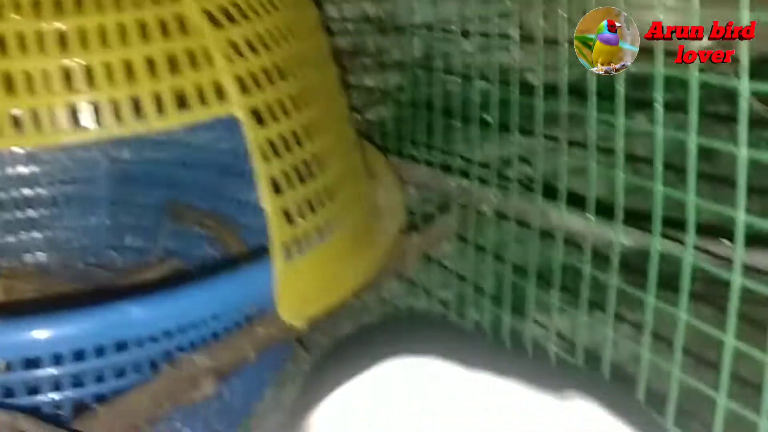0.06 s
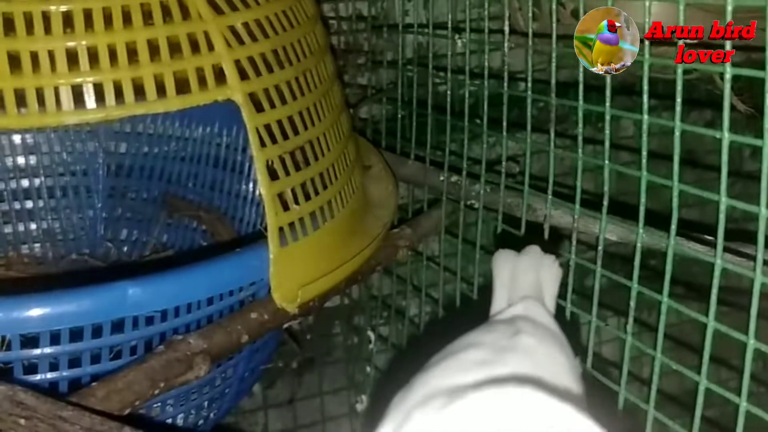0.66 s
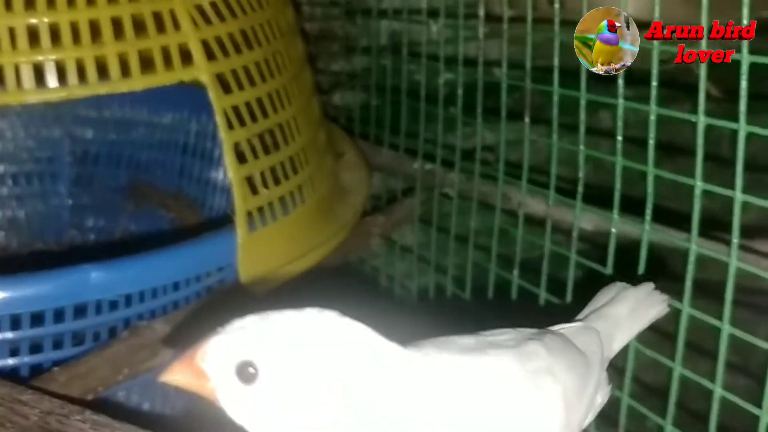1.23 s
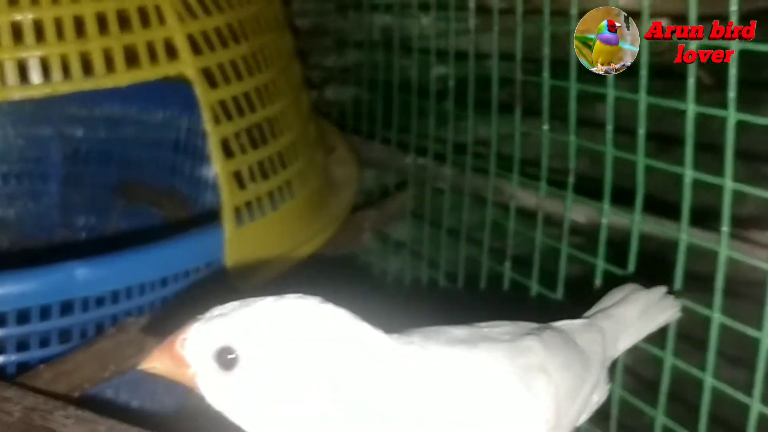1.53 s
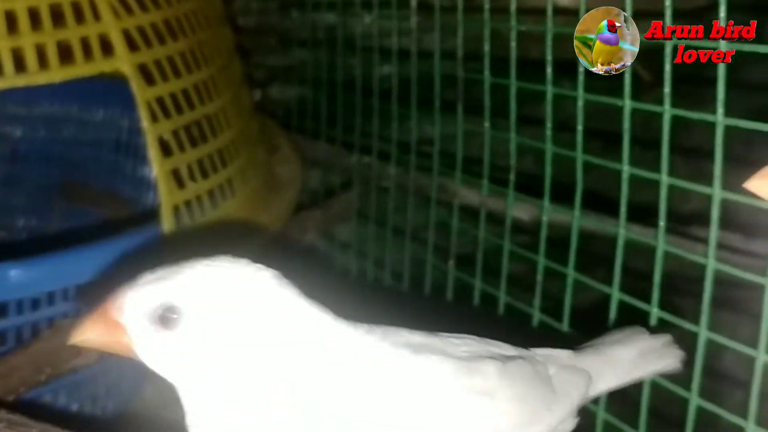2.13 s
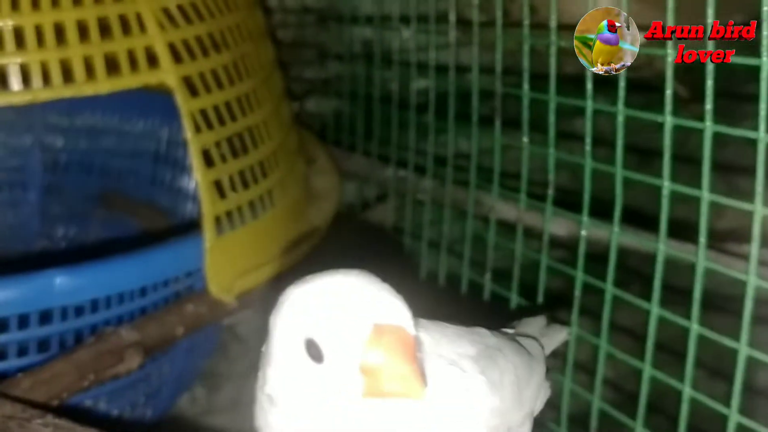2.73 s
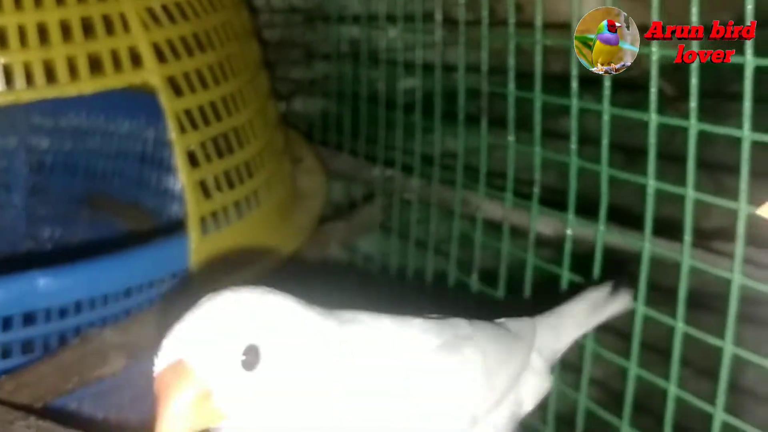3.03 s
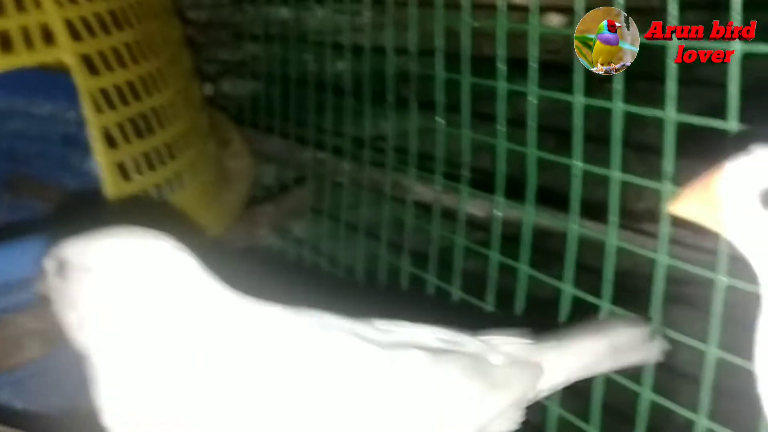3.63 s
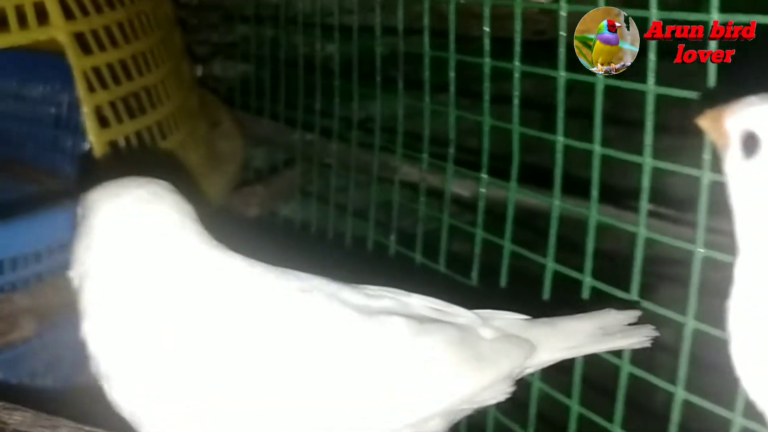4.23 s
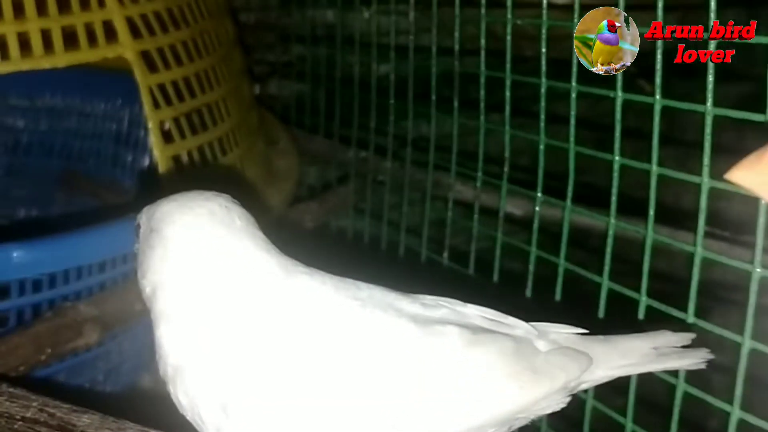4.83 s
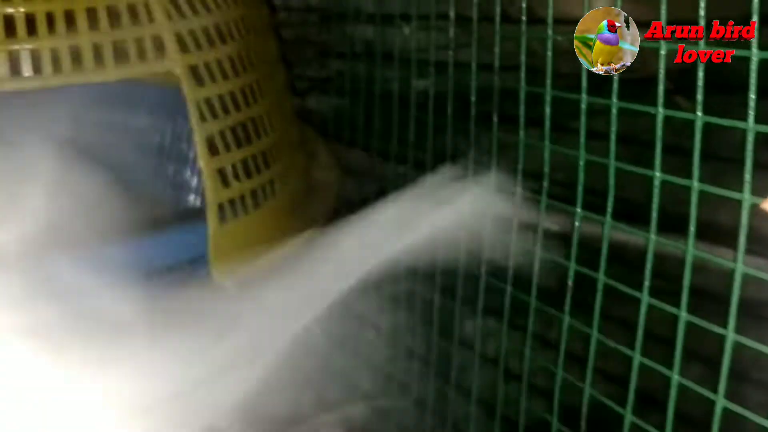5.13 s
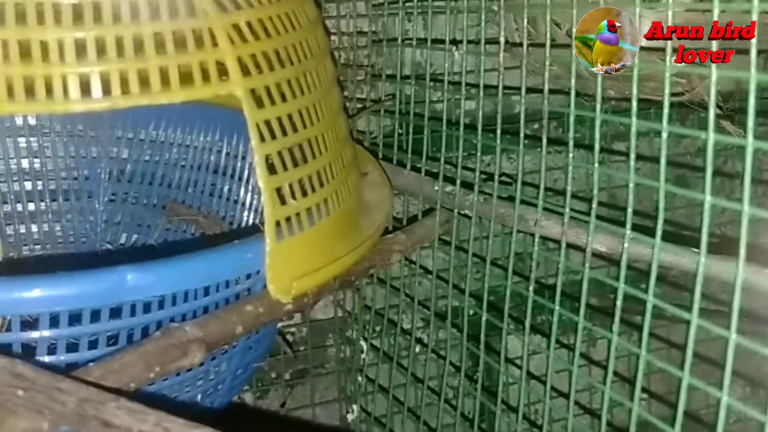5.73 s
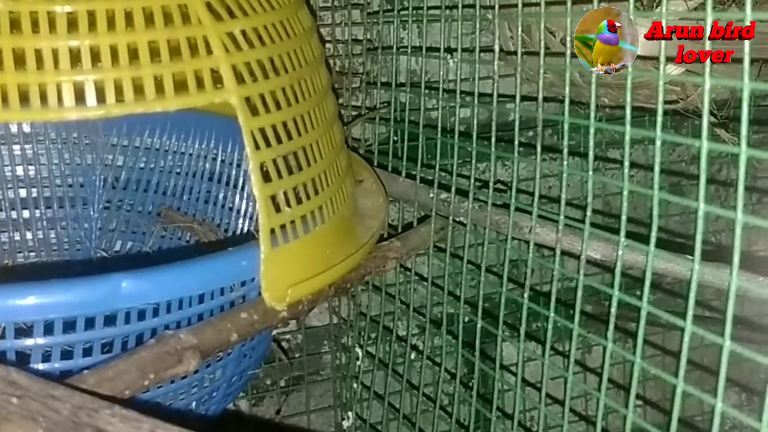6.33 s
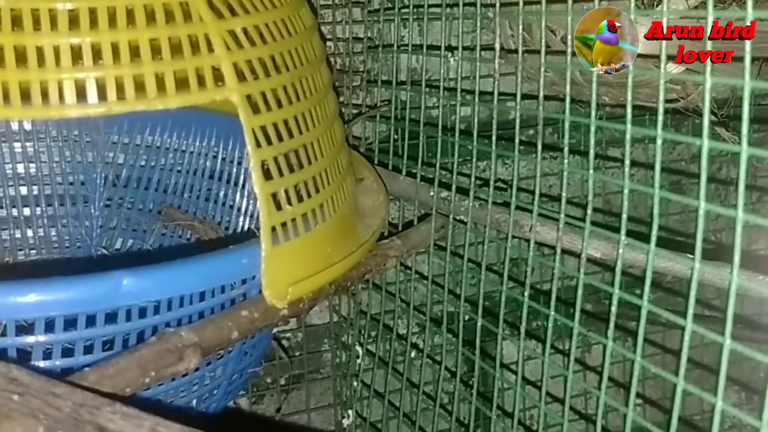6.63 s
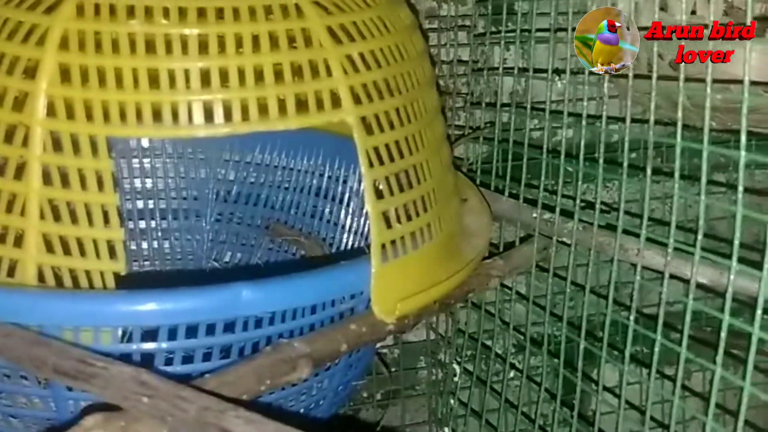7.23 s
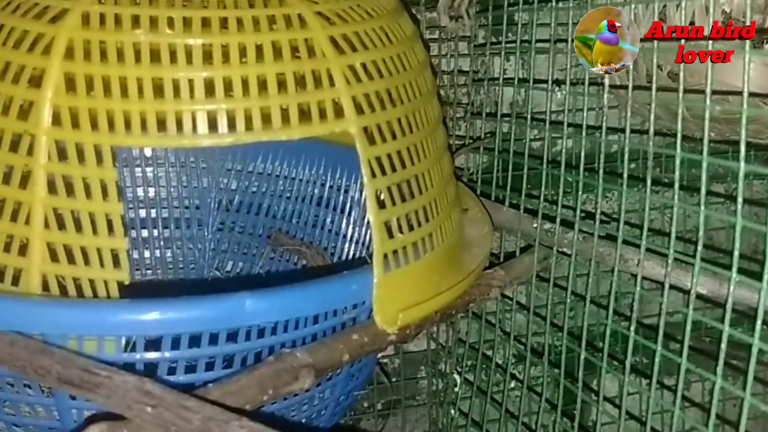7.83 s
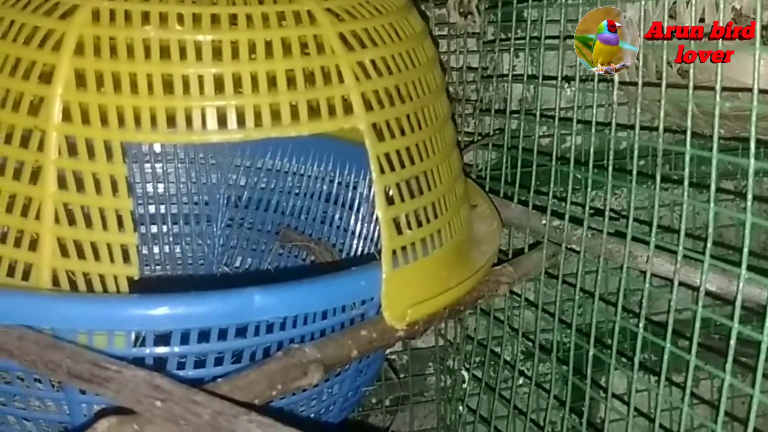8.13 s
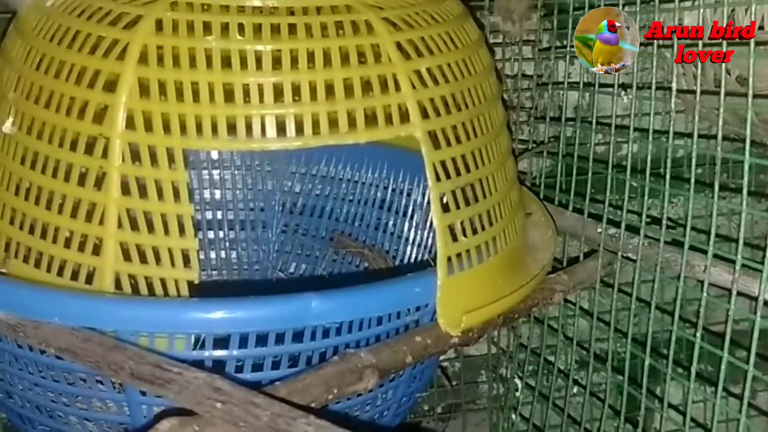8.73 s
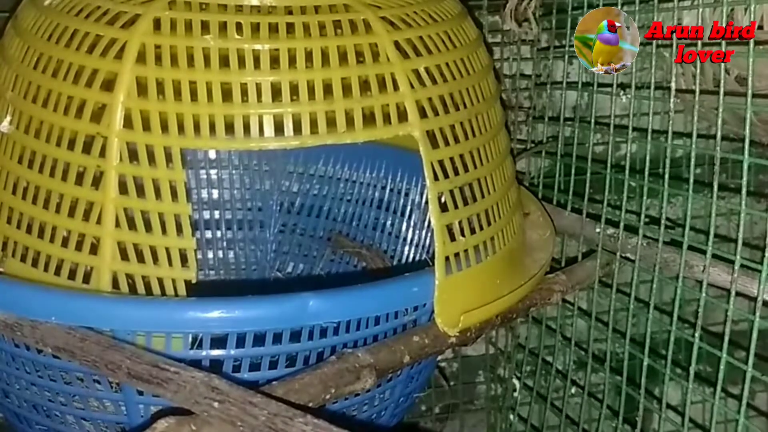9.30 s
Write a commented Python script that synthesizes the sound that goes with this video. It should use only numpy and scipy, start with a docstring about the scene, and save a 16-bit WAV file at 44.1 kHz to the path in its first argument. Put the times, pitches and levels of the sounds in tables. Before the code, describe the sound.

Close wing gusts thump the microphone on the right, one sharply overloading it, as small finches flutter, tap and rustle in a wire cage in a small room. The movement pauses, leaving a quiet motor hum, a soft nasal call and two faraway crow caws. After another call, plumage rubs the microphone with a low rumble. The taps, rustles and puffs of air return, with faint squeaks and the crow cawing again outside.

```python
"""Small finches preen and hop in a wire cage beside a phone: feathers rustle, claws tap, wing draught thumps
on the right port. At 0.8 s a wing overloads it as a soft nasal call sounds; two flutters follow.
In a lull a finch calls (3.3 s) and a far crow caws twice. After a third call (5 s) a bird brushes
the phone. From the fourth (6.9 s) the hopping resumes, with three more caws behind it.
A low motor hums throughout."""
import sys
import numpy as np
from scipy import signal
from scipy.fft import rfft, irfft, next_fast_len
from scipy.io import wavfile
from scipy.ndimage import uniform_filter1d

SR = 44100
rng = np.random.default_rng(int(sys.argv[2]) if len(sys.argv) > 2 else 0)


def to_wav(sig):
    """Store sig (one row per channel, or 1-D mono) as 16-bit WAV at the path in sys.argv[1].

    Samples outside -1..1 are clipped; the rate is SR.
    """
    pcm = np.clip(np.atleast_2d(sig), -1, 1) * 32767
    pcm = np.round(pcm).astype(np.int16)
    wavfile.write(sys.argv[1], SR, pcm.T)  # frames by channels


N = 421596
T = np.arange(N) / SR

# shuffling, preening, shaking: peak t/s, level/dB, rise/s, fall/s
PREEN_SWELLS = [(.11, -60.5, .2, .19), (.805, -59, .06, .14), (1.035, -68, .05, 0.22),
                (1.24, -59.5, 0.095, .1), (1.40, -57.5, 0.19, 0.27), (1.86, -51.5, 0.27, 0.12),
                (2.09, -58.5, .05, 0.13), (2.27, -58.5, 0.036, 0.12), (2.575, -69.5, 0.029, 0.069),
                (5.25, -61, .14, .24), (5.55, -58.5, 0.19, .45), (5.955, -64.5, 0.23, .13),
                (6.112, -64.5, 0.032, .17), (6.812, -69, 0.039, .22), (7.258, -66.5, 0.044, .19),
                (7.645, -58.5, 0.22, .16), (7.86, -52.5, 0.091, .13), (8.112, -64.5, .03, .33),
                (8.48, -56.5, .03, 0.23), (8.74, -57, .09, .15), (8.95, -59.5, 0.2, .38),
                (9.28, -62, 0.25, .27), (9.425, -67, .04, .2)]
# feather friction: f/Hz, level/dB
FEATHER_SPECTRUM = [(150, -29), (300, -11), (600, -7), (1200, -10.5), (2200, -12), (3400, -14.5),
                    (5000, -9), (6300, -10.5), (7500, -1.5), (8800, -3), (10200, -9), (13800, -9.5)]


def feathers():
    """Barbs slide over each other in uneven strokes; harder rubbing makes them catch and snap."""
    effort = swells(PREEN_SWELLS)
    strokes = unit(amp(2.3 * wobble(45)))
    catching = np.clip(effort / amp(-61), .35, 1) * barbs(rate_hz=170, spread_db=4)
    grain = patchy(noise() + catching, depth_db=1.4)
    return amp(-0.5) * effort * strokes * coloured(grain, FEATHER_SPECTRUM)


def barbs(rate_hz, spread_db):
    """Tiny random snaps of very uneven size, rms 1."""
    snaps = rng.random(N) < rate_hz / SR
    size = amp(spread_db * np.minimum(rng.exponential(size=N), 4))
    decay_s = 0.00046
    envelope = signal.lfilter([1], [1, -np.exp(-1 / (decay_s * SR))], snaps * size)
    return unit(noise() * envelope)


# wingbeat runs: start t/s, length/s, first level/dB, growth/(dB/s)
FLUTTER_RUNS = [(1.174, .088, -45, 85), (1.595, .263, -44.5, 60)]


def wingbeats(period_s=.0348, gain_db=1.5, knock_db=-4):
    """A flutter is an even run of growing wing flicks; rows as in CONTACTS."""
    return [(s + t, gain_db + db + growth * t, knock_db)
            for s, length_s, db, growth in FLUTTER_RUNS for t in np.arange(0, length_s, period_s)]


# wing flicks, claw landings: t/s, level/dB, relative knock/dB
CONTACTS = [(.1108, -28.5, -1), (.236, -48, -1.5), (.302, -53, -18), (1.0072, -50, 6), (1.509, -38.5, -13),
            (1.5297, -38, -2.5), (2.0238, -36.5, 4.5), (2.0715, -31.5, 11), (2.1033, -31.5, 3),
            (2.1708, -43, 4.5), (2.221, -43.5, 2), (2.254, -40, -1), (5.198, -43.5, 2.5), (5.35, -46.5, 8),
            (5.5002, -42, 9.5), (5.5317, -36, 2), (7.403, -49.5, -15), (7.5136, -44.5, -7),
            (7.604, -34.5, 5.5), (7.842, -30.5, -3.5), (7.938, -40.5, 1.5), (8.462, -36, 0.5),
            (8.5658, -29, -10), (8.6905, -39.5, 1)]
# bright contact, dull cage knock: f/Hz, level/dB
CLAW_SPECTRUM = [(300, -42), (2000, -12.5), (3500, -16), (6000, -7.5), (8500, 1), (10500, -7.5),
                 (14000, -6.5)]
CAGE_SPECTRUM = [(60, -8), (200, 12.5), (600, 8.5), (1200, -2), (2200, -5.5), (4500, -6.5), (9000, -27)]


def flicks(attack_s=0.0036, t60_s=0.033, graze_db=-15, graze_s=0.0051):
    """Each flick, wingbeat or landing is a clump of bright contacts with a dull knock from the cage."""
    bright, dull = np.zeros(N), np.zeros(N)
    t = np.arange(-SR // 25, SR // 5) / SR
    after = np.maximum(t, 0)
    blow = (1 - np.exp(-(after / attack_s) ** 2)) * amp(-60 * after / t60_s)
    blow += amp(graze_db) * np.exp(-np.abs(t) / graze_s)  # feathers graze ahead of the contact
    for s, db, knock_db in list(CONTACTS) + wingbeats():
        add(bright, s + t[0], amp(db) * blow)
        add(dull, s + t[0], amp(db + knock_db) * blow)
    catches = unit(amp(4 * wobble(900)))
    taps = bright * coloured(noise() * catches, CLAW_SPECTRUM)
    knocks = dull * coloured(noise(), CAGE_SPECTRUM)
    return amp(-2) * taps + amp(-10) * knocks


# air from wing strokes and hops: peak t/s, level/dB, rise/s, fall/s
GUST_SWELLS = [(.096, -28.5, 0.072, 0.071), (.83, -31, .02, 0.13), (2.1, -52, 0.16, .35),
               (7.85, -31.5, 0.068, 0.1), (8.53, -30.5, 0.079, 0.073), (9.18, -36, 0.17, 0.25)]
# port buffeting: f/Hz, level/dB
BUFFET_SPECTRUM = [(10, -20), (30, 5), (70, 0), (130, -16), (250, -26), (500, -36.5), (1200, -50),
                   (4000, -93.5)]


def draught():
    """Stirred air buffets the right port; little reaches the left."""
    return swells(GUST_SWELLS) * coloured(noise(), BUFFET_SPECTRUM) * amp([[-11], [4]])


# eddies at the right port: t/s, level/dB, half length/s, turbulence f/Hz
EDDIES = [(.043, -22, .0036, 120), (0.093, -16, 0.0066, 68), (.108, -13, 0.0048, 320),
          (.118, -30, .00033, 1790), (.13, -24, 0.0089, 250), (0.8123, -8, 0.0012, 899),
          (.897, -36.5, 0.013, 289.6), (0.941, -40, 0.0096, 257), (2.078, -46, .02, 150),
          (6.969, -48.5, .0058, 430), (7.026, -58.5, .033, 483), (7.70, -50, .017, 400),
          (8.567, -29, 0.005, 40), (8.581, -30.5, .012, 593), (9.184, -32.5, .009, 265)]


def puffs():
    """An eddy thumps with turbulent suction; the microphone's bass cut shapes a soft swell around it."""
    port = np.zeros(N)
    t = np.arange(-SR // 16, SR // 16) / SR
    for s, db, half_s, eddy_hz in EDDIES:
        core = np.exp(-(t / half_s) ** 2)
        band = lambda hz: hz / (hz + eddy_hz / 5) / (1 + (hz / eddy_hz) ** 3)
        churn = filtered(rng.standard_normal(len(t)), band) * core
        churn *= np.linalg.norm(core) / np.linalg.norm(churn)
        low_swell = np.exp(-np.abs(t) / (0.0068 + half_s))
        suction = core - low_swell * core.sum() / low_swell.sum()
        turbulence = min(0.27 + 90 * half_s, 1)  # long eddies have broken up more
        add(port, s + t[0], amp(db) * (turbulence * churn - (1.25 - turbulence) * suction))
    return port * amp([[-42], [0]])


def wing_slap(at_s=.8093, gain_db=2, half_s=0.0013, tip_db=3.5, crack_db=-19):
    """A wing whips past the right port: a block of suction, split by the snap of the feather tip."""
    t = np.arange(-SR // 16, SR // 16) / SR
    suction = np.exp(-np.minimum(np.abs(t / half_s), 4) ** 5)
    tip = np.exp(-np.abs((t + .00045) / .00019) ** 1.3)
    crack = rng.standard_normal(len(t)) * np.exp(-np.abs(t + .0003) / .0005)
    low_swell = 0.077 * np.exp(-np.abs(t) / 0.016)  # shaped by the microphone's bass cut
    pulse = low_swell - suction + amp(tip_db) * tip + amp(crack_db) * crack
    port = np.zeros(N)
    add(port, at_s + t[0], amp(gain_db) * pulse)
    return port * amp([[-44], [0]])


# bird against the phone: peak t/s, level/dB, rise/s, fall/s
BRUSH_SWELLS = [(5.29, -41.5, 0.14, 0.22), (5.5, -44.5, 0.14, 0.072), (5.68, -40, 0.15, 0.31)]
# brushed shell: f/Hz, level/dB
SHELL_SPECTRUM = [(15, -26), (25, 4.5), (71, -0.5), (168, -12), (456, -29.5), (958, -36), (1220, -42),
                  (1750, -39.5), (2220, -45.5), (3000, -47.5), (3900, -46.5), (6600, -120)]


def brush(bumps_db=3.0):
    """Plumage drags over the phone's shell with a bumpy rumble and small catches."""
    drag = noise() + .8 * barbs(rate_hz=70, spread_db=3)
    pressure = swells(BRUSH_SWELLS) * unit(amp(bumps_db * wobble(35)))
    return pressure * coloured(drag, SHELL_SPECTRUM) * amp([[-2], [4]])


# calls: t/s, length/s, pitch/Hz, level/dB, lower resonance f/Hz, half width/Hz, upper resonance/dB, rasp
NASAL_CALLS = [(0.817, .13, 553.5, -52, 2850, 1240, -11.5, 0.1),
               (3.319, .076, 546, -66, 3350, 2800, 6, 0.5),
               (5.037, .074, 573.5, -51, 4146, 1097, -0.5, 0.4),
               (6.927, 0.083, 548.4, -60.5, 3900, 3410, 5, 0.2)]
# lift, then sag: length fraction, pitch ratio
CALL_CONTOUR = [(0, .94), (.3, 1), (.55, 0.98), (1, .93)]
# walls near the birds: f/Hz, T60/s
PERCH_DECAY = [(2000, 0.087), (9000, 0.13)]


def finches(upper_hz=8100):
    """Short nasal, raspy stacks of harmonics through two resonances of the throat and beak."""
    voice = np.zeros(N)
    for s, length_s, pitch_hz, db, lower_hz, width_hz, upper_db, rasp in NASAL_CALLS:
        def throat(hz):
            lower = 1 / (1 + ((hz - lower_hz) / width_hz) ** 2)
            upper = amp(upper_db) / (1 + ((hz - upper_hz) / 1100) ** 2)
            return (lower + upper + 0.083) / (1 + (600 / (hz + 1)) ** 2)

        u = np.arange(int(length_s * SR)) / (length_s * SR)
        bend = np.interp(u, *np.transpose(CALL_CONTOUR))
        jitter = 1 + .01 * wobble(400, count=len(u))
        phase = 2 * np.pi * np.cumsum(pitch_hz * bend * jitter) / SR
        stack = unit(sum(np.cos(k * phase + 2 * rng.random()) for k in range(1, 26)))
        air = unit(rng.standard_normal(len(u)) * (1 + np.cos(phase)))  # escapes once a cycle
        call = filtered(np.sqrt(1 - rasp) * stack + np.sqrt(rasp) * air, throat)
        envelope = np.sin(np.pi * u) ** 1.1
        add(voice, s, amp(db) * envelope * unit(call))
    return amp(-5.5) * voice + amp(-1) * echoes(voice, PERCH_DECAY)


# thin squeaks: t/s, half length/s, f/Hz, level/dB
WHISTLES = [(1.354, 0.016, 7180, -56), (7.29, 0.041, 7730, -71), (8.651, .008, 8430, -58.5),
            (9.06, 0.048, 7860, -69.5)]


def squeaks():
    """Faint, wavering whistles high above the calls."""
    tones = np.zeros(N)
    t = np.arange(-SR // 8, SR // 8) / SR
    for s, half_s, hz, db in WHISTLES:
        waver = 1 + 0.0122 * wobble(295, count=len(t))
        phase = 2 * np.pi * np.cumsum(hz * waver) / SR
        add(tones, s + t[0], amp(db) * np.exp(-(t / half_s) ** 2) * np.sin(phase))
    return tones


# caws: t/s, length/s, pitch/Hz, level/dB, throat frequency ratio
CROW_CAWS = [(3.516, 0.23, 481.6, -61.5, 0.99), (4.075, 0.26, 473.5, -61.5, 0.96),
             (7.468, 0.25, 497.4, -63.5, 0.95), (8.069, 0.24, 481, -64.5, 0.88),
             (8.794, 0.28, 493, -63.5, 0.99)]
# arch, then drop: length fraction, pitch ratio
CAW_CONTOUR = [(0, .9), (.25, .98), (.6, 1), (.85, .93), (1, .57)]
# throat resonances: f/Hz, level/dB
CROW_SPECTRUM = [(450, -40), (750, -7), (920, -6), (1200, -9), (1520, -5), (1750, -0.5), (2000, -2.5),
                 (2200, -5), (2700, -36.5), (4500, -25), (8000, -16), (11000, -31)]
# outdoor echoes: f/Hz, T60/s
YARD_DECAY = [(500, 0.36), (2000, 0.54), (8000, 0.38)]


def crow():
    """Hoarse caws, roughened by a slower flutter of the membranes and blurred by distance."""
    voice = np.zeros(N)
    for s, length_s, pitch_hz, db, throat_ratio in CROW_CAWS:
        u = np.arange(int(length_s * SR)) / (length_s * SR)
        arch = np.interp(u, *np.transpose(CAW_CONTOUR))
        jitter = 1 + .04 * wobble(450, count=len(u)) + .016 * wobble(20, count=len(u))
        phase = 2 * np.pi * np.cumsum(pitch_hz * arch * jitter) / SR
        stack = sum(np.cos(k * phase) for k in range(1, 22))
        rasp = 1 + .9 * np.sin(phase / 3 + wobble(90, count=len(u)))  # fills in between harmonics
        throat = np.multiply(CROW_SPECTRUM, [throat_ratio, 1])
        envelope = np.sqrt(np.sin(np.pi * u))
        add(voice, s, amp(db) * envelope * coloured(stack * rasp, throat))
    return amp(-12) * voice + amp(-1) * echoes(voice, YARD_DECAY)


# motor tones, steady hiss: f/Hz, level/dB
MOTOR_TONES = [(37.7, -57), (75.4, -64), (113.1, -90), (150.7, -76), (791, -94)]
HISS_SPECTRUM = [(100, -8), (300, -21.5), (500, -18.5), (800, -24.5), (1800, -28), (2600, -35.5),
                 (5500, -33), (8500, -26.5), (11000, -33), (14500, -34.5)]


def motor_and_hiss():
    """A motor hums and rumbles steadily over a faint hiss."""
    drifting_s = T + 0.00014 * wobble(1)
    hum = sum(np.sqrt(2) * amp(db) * np.sin(2 * np.pi * (hz * drifting_s + rng.random()))
              for hz, db in MOTOR_TONES)
    rumble = coloured(rng.standard_normal(N), [(10, -10), (40, 8.5), (130, -8), (300, -17), (900, -54.5)])
    return hum + amp(-66) * rumble + amp(-72.5) * coloured(noise(), HISS_SPECTRUM)


def amp(db):
    """Decibels to gain."""
    return 10 ** (np.asarray(db) / 20)


def unit(x):
    """Scale to rms 1."""
    return x / np.sqrt(np.mean(x ** 2) + 1e-20)


def along(points, hz):
    """Read (f/Hz, value) points on a log axis."""
    f, v = np.transpose(points)
    return np.interp(np.log(hz + 1), np.log(f + 1), v)


def noise(count=N):
    """White noise, unrelated at the two ports."""
    return rng.standard_normal((2, count))


def wobble(rate_hz, count=N):
    """Smooth random curve with knots at rate_hz."""
    knots = rng.standard_normal(int(count * rate_hz / SR) + 2)
    index, step = np.divmod(np.arange(count) * rate_hz / SR, 1)
    index = index.astype(int)
    return knots[index] + np.diff(knots, append=0)[index] * step * step * (3 - 2 * step)


def swells(rows, drop_db=18, roundness=1.35):
    """Gain of movements, each drop_db down one rise or fall from its peak; overlaps add in power."""
    t = np.arange(0, N / SR, 1 / 1000)
    power = np.zeros(len(t))
    for s, db, rise_s, fall_s in rows:
        away = np.abs((t - s) / np.where(t < s, rise_s, fall_s))
        power += amp(db - drop_db * away ** roundness) ** 2
    return np.interp(T, t, np.sqrt(power))


def filtered(x, response):
    """x times a response of frequency."""
    n = x.shape[-1]
    m = next_fast_len(n + 8192)
    return irfft(rfft(x, m) * response(np.fft.rfftfreq(m, 1 / SR)), m)[..., :n]


def coloured(x, spectrum):
    """x through an (f/Hz, level/dB) spectrum, at rms 1."""
    return unit(filtered(x, lambda hz: amp(along(spectrum, hz))))


def patchy(x, depth_db):
    """Drift the colour in patches of time and frequency."""
    z = signal.stft(x, nperseg=256)[2]
    field = uniform_filter1d(rng.standard_normal(z.shape[1:]), size=6, axis=0)
    field = uniform_filter1d(field, size=14, axis=1)
    return signal.istft(z * amp(depth_db * unit(field)), nperseg=256)[1][:, :N]


def echoes(x, decay):
    """Diffuse stereo tail; each frequency dies at its own speed."""
    hz, t, z = signal.stft(noise(count=SR // 2), SR, nperseg=256)
    tail = signal.istft(z * amp(-60 * t / along(decay, hz)[:, None]), SR, nperseg=256)[1]
    return signal.fftconvolve(np.atleast_2d(x), tail / np.linalg.norm(tail[0]), axes=1)[:, :N]


def add(track, s, sound):
    """Mix a sound into a track at time s."""
    start = round(s * SR)
    sound = sound[..., max(-start, 0):]
    part = track[..., max(start, 0):][..., :sound.shape[-1]]
    part += sound[..., :part.shape[-1]]


# small room: f/Hz, T60/s
ROOM_DECAY = [(200, 0.14), (2000, .2), (8000, 0.067), (14000, 0.18)]


def scene():
    """The birds in their small room, with the outdoors behind."""
    movement = feathers() + flicks() + squeaks()
    airborne = movement + amp(-2.5) * echoes(movement, ROOM_DECAY) + finches() + crow() + motor_and_hiss()
    return airborne + draught() + puffs() + wing_slap() + brush()


# microphone ports: f/Hz, gain/dB
LEFT_RESPONSE = [(2000, 2), (4000, 3.5), (6000, 3), (8500, 7.5), (14000, 3.5)]
RIGHT_RESPONSE = [(2000, 1.5), (4000, 6), (6000, 2.5), (8500, 1.5), (14000, -6)]


def record(dry):
    """Each port has its own treble; the input clips at full scale and the band is limited."""
    ports = filtered(dry, lambda hz: amp([along(LEFT_RESPONSE, hz), along(RIGHT_RESPONSE, hz)]))
    clipped = np.clip(ports, -1, 1)
    cutoff_hz = 14500
    return filtered(clipped, lambda hz: 1 / (1 + (hz / cutoff_hz) ** 100))


dry = scene()
out = record(dry)
to_wav(out)
```